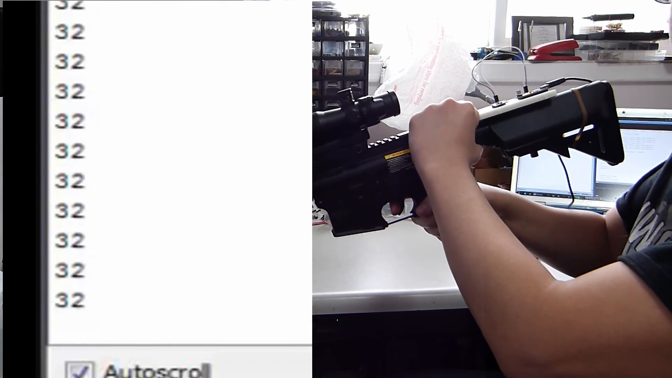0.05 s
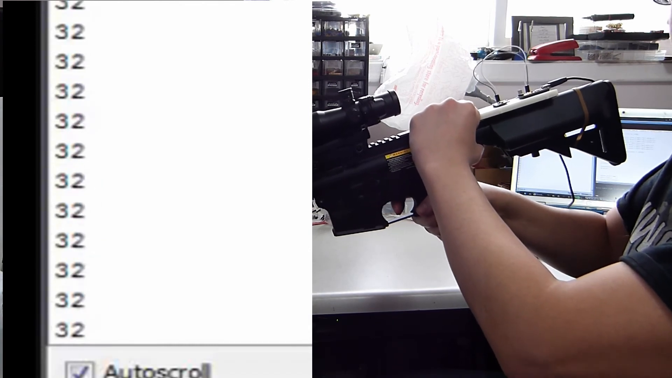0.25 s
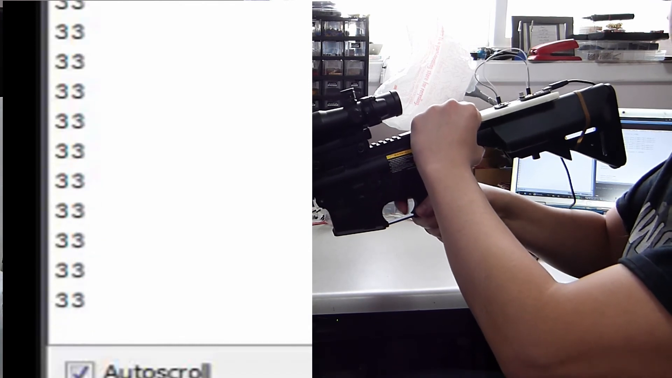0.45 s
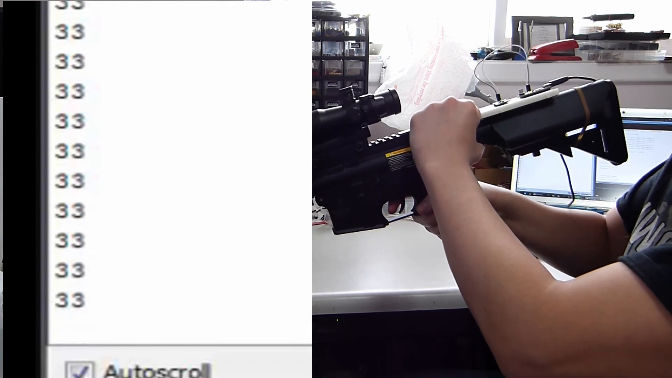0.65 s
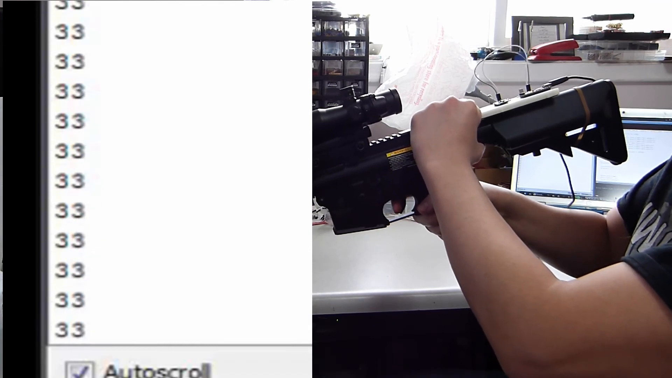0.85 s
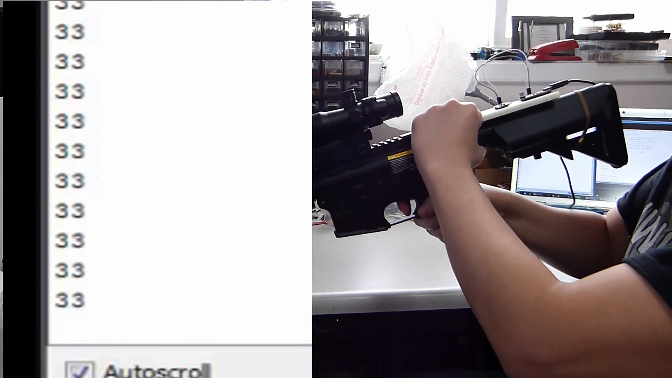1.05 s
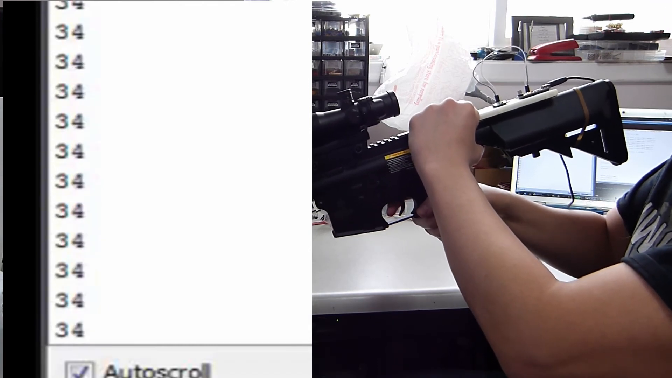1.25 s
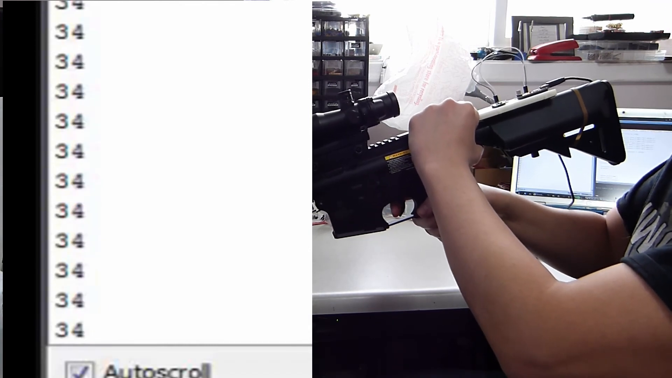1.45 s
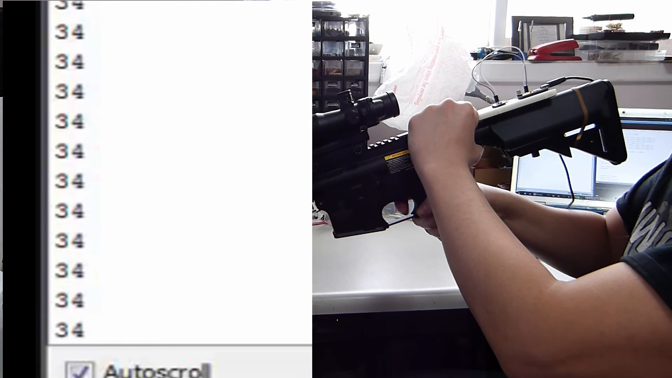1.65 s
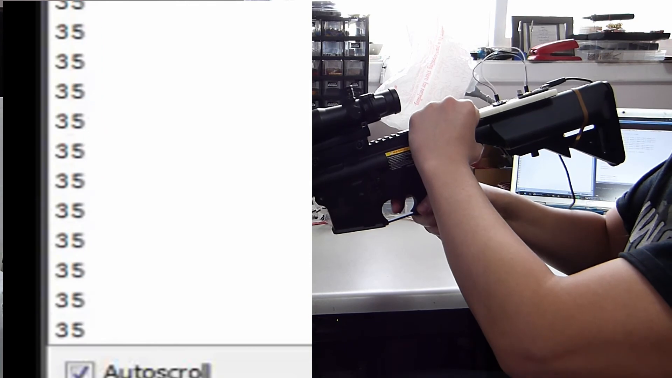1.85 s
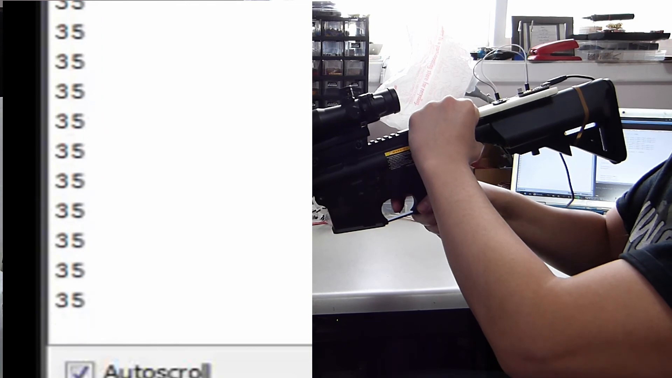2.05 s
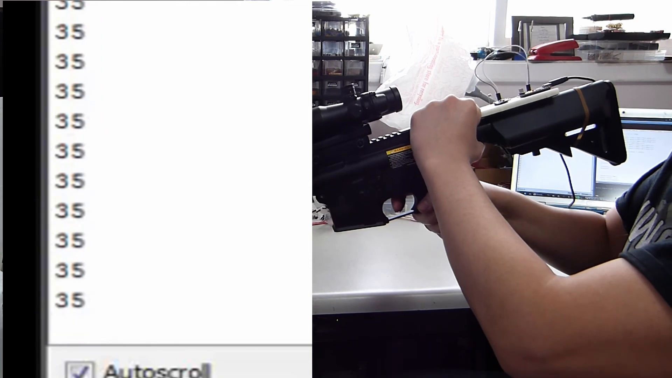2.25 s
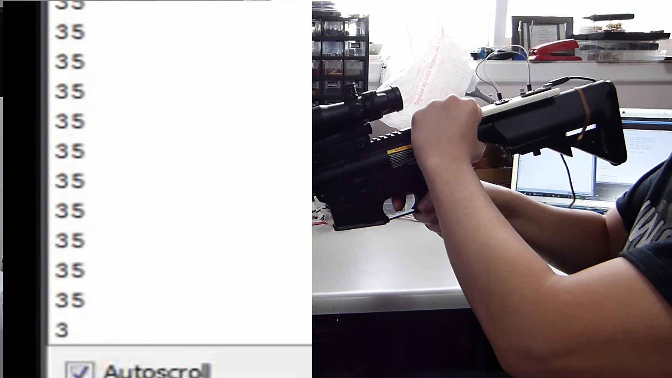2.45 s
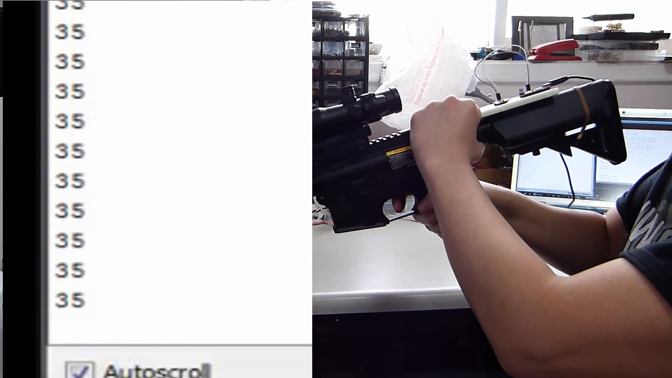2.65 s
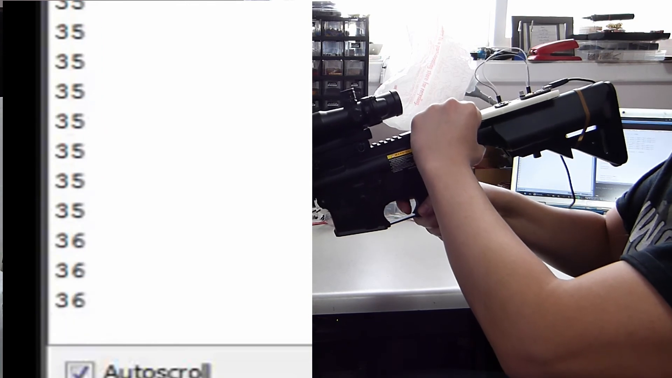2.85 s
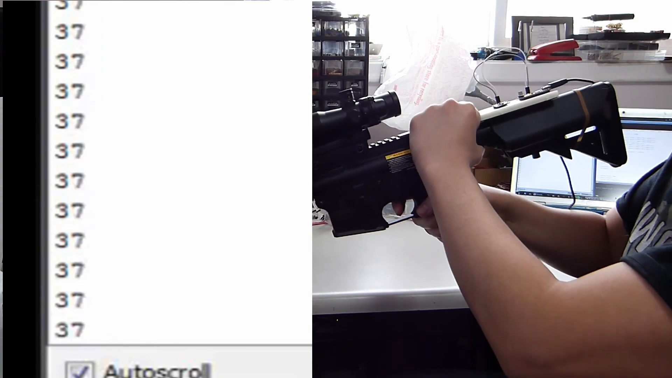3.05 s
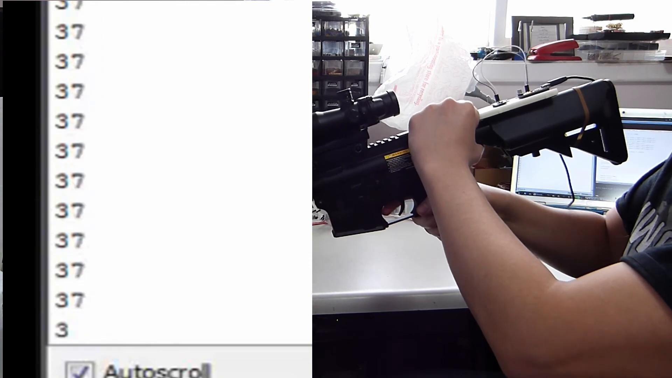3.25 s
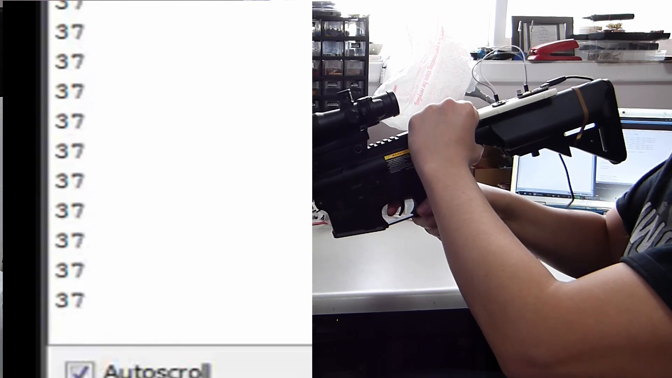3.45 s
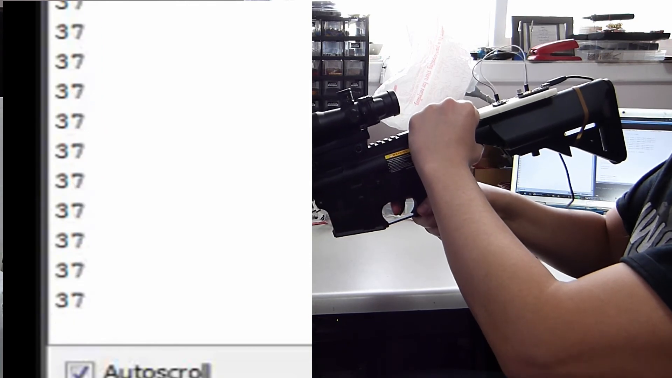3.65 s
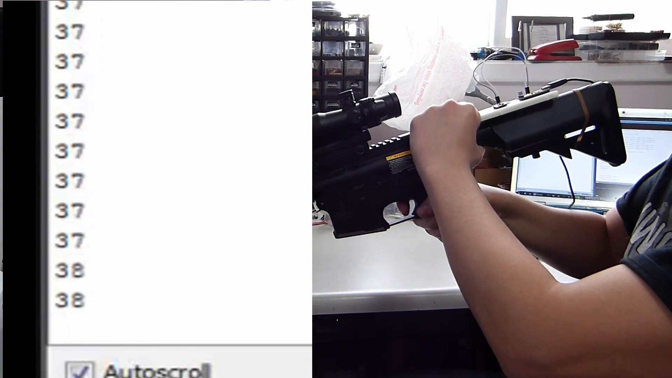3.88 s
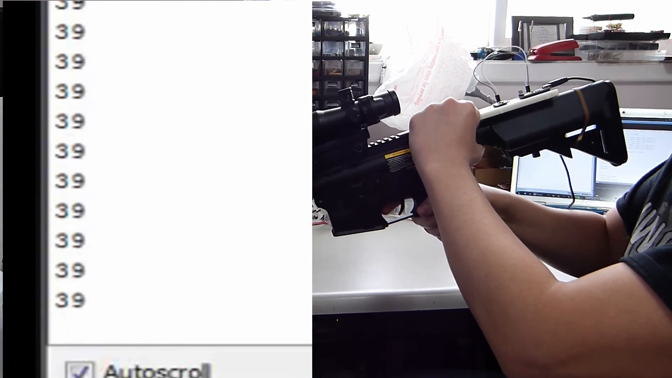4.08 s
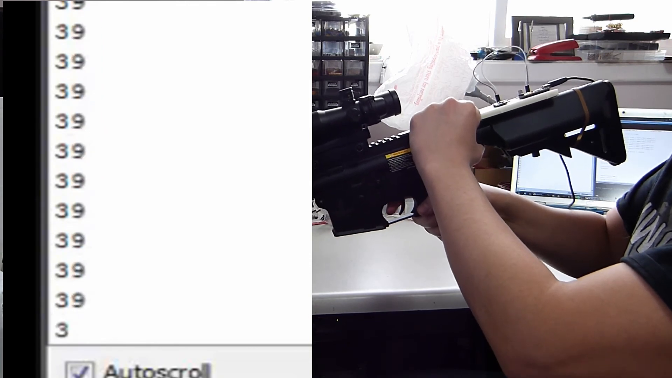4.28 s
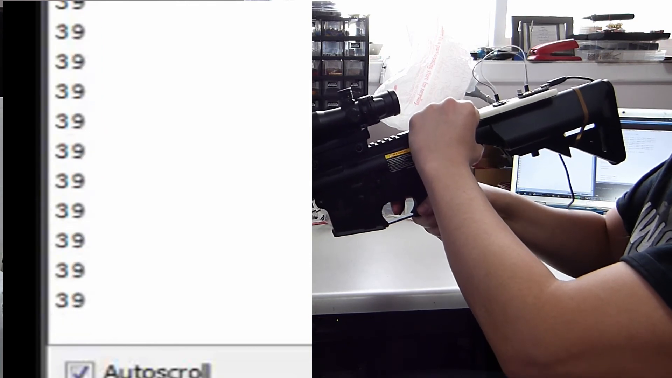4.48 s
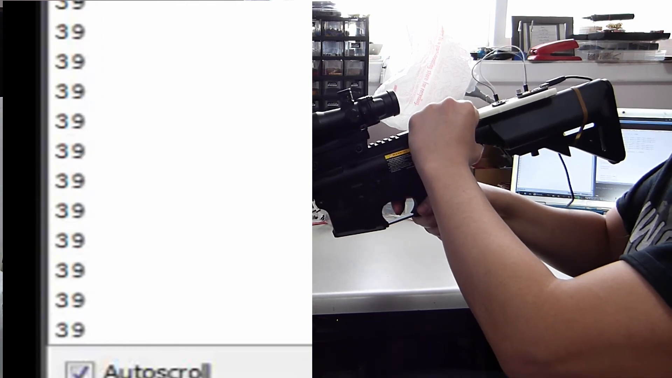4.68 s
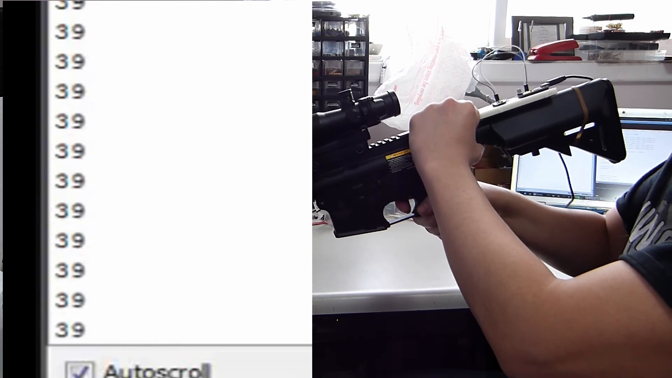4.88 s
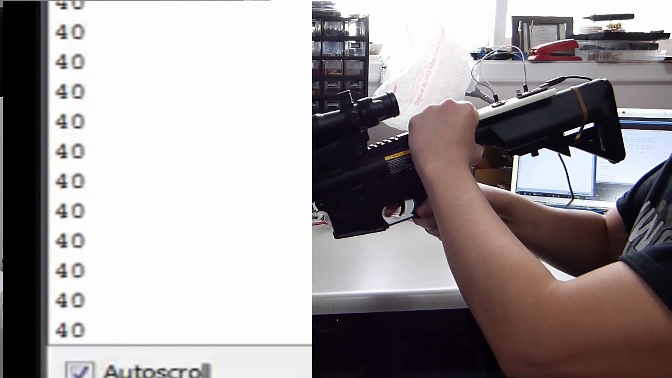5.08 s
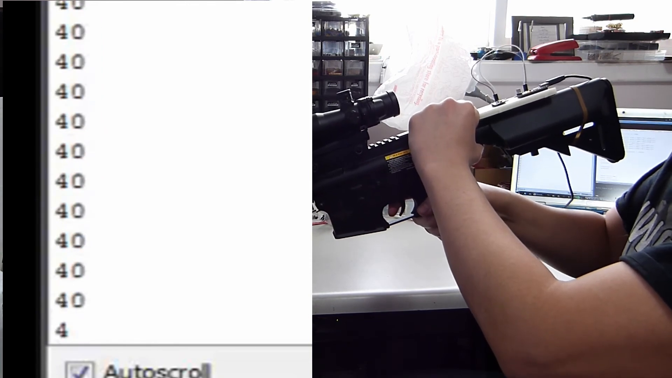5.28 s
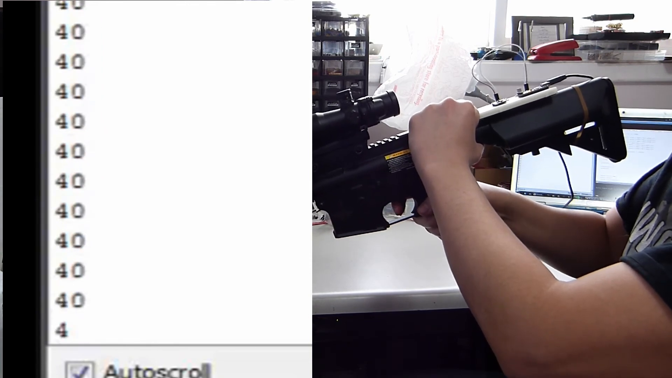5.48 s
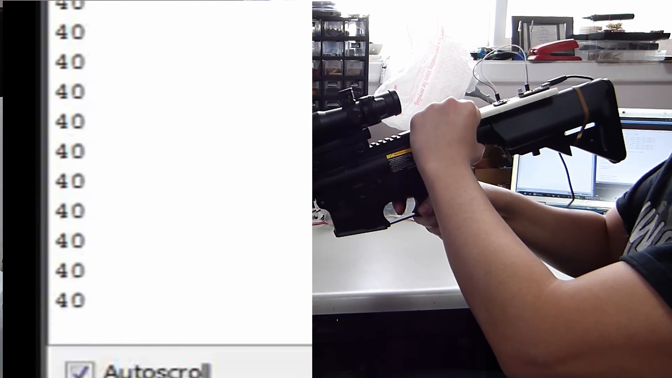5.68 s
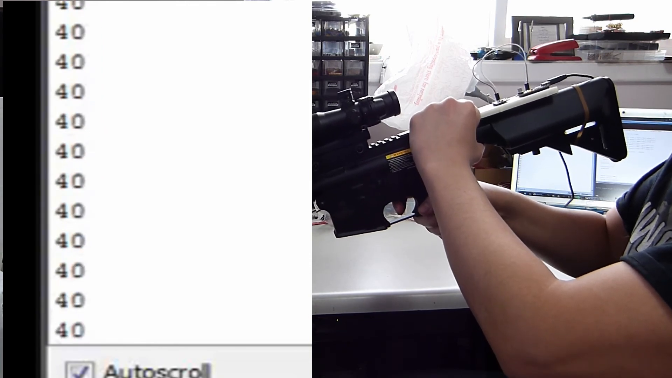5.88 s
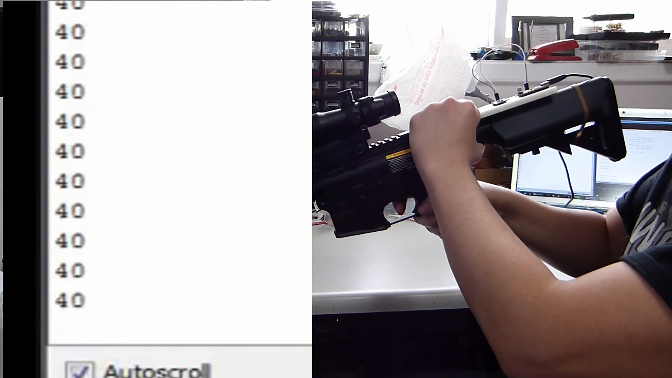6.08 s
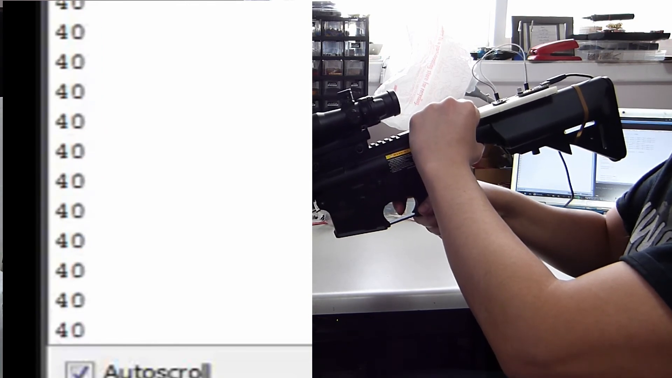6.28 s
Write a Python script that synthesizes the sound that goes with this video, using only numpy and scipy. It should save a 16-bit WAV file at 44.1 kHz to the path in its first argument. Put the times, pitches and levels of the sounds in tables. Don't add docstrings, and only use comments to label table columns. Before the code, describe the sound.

Close airsoft rifle fires six trigger pulls indoors, each a click, brief gear whir and sharp snapping crack, two pulls doubling, with a short room ring.

```python
import sys
import numpy as np
from scipy import signal
from scipy.fft import rfft, irfft
from scipy.io import wavfile
from scipy.ndimage import uniform_filter1d

SR = 44100
rng = np.random.default_rng(int(sys.argv[2]) if len(sys.argv) > 2 else 0)


def gain_from_db(level_db):
    decades = np.asarray(level_db, float) / 20
    return 10 ** decades


def bounce(signal):
    frames = np.transpose(np.atleast_2d(signal))
    limited = np.clip(frames, -1, 1)
    pcm = np.round(limited * 32767).astype(np.int16)
    wavfile.write(sys.argv[1], SR, pcm)


N = 279153

IMPACTS = [
    .5268,
    1.2059,
    1.8729,
    3.0016,
    3.1171,
    3.9635,
    4.0785,
    5.0861,
]
# (motor start [s], grind end [s], grind at speed [dB], casing ring [dB],
# teeth catch after [s])
PULLS = [
    (0.41, 0.535, -19.5, 4, .036),
    (1.098, 1.203, -20, 3.5, .042),
    (1.75, 1.881, -21, 5, 0.044),
    (2.887, 3.006, -19, 3.5, 0.039),
    (3.845, 3.967, -19.5, 2, .04),
    (4.972, 5.085, -20.5, 5, .039),
]
# (frequency [Hz], density [dB per Hz])
CRACK = [(290, -32.5), (500, -2.5), (1470, -1), (1900, -5), (3570, -6), (4490, -5.5), (5040, -5.5),
         (7640, -5.5), (10900, -9.5), (15400, -24)]
# (frequency [Hz], width [Hz], level [dB])
CASING = [(665.7, 8.5, -1.5), (712.5, 13, -1), (795, 42, 2), (910, 20, -12), (1213, 44, -6.5)]


def piston(thump_room_db=-4):
    # (crack [dB], push [dB], recoil [dB], room blast [dB], barrel ring [dB])
    slams = [
        (-16, -18, -14.5, 18, -18),
        (-14.5, -16.5, -14, 18.5, -9),
        (-16, -18.5, -15.5, 18.5, -6),
        (-12.5, -21, -15.5, 12, -15.5),
        (-15, -20.5, -19.5, 20, -5.5),
        (-13.5, -18.5, -14, 16, -2.5),
        (-16, -20.5, -20, 18.5, 0.5),
        (-13, -16, -14, 18.5, -13.5),
    ]
    # (frequency [Hz], level [dB], t60 [s])
    thud = [(121, -22, 0.1), (190, -14.5, 0.0034), (343.7, 3.5, 0.017)]
    # (frequency [Hz], level [dB], t60 [s])
    barrel = [(5491, -61, 1.2), (7187, -66, 1.2), (7924, -65, 1.0), (8716, -63, 1.3)]
    # (frequency [Hz], level [dB], t60 [s])
    hollow = [(743, -22, .45), (765, -24.5, 0.31)]
    # (lag [s], level [dB])
    reflections = [(.0066, 0.5), (.014, -5.5), (0.017, -5)]
    s = np.array(IMPACTS)
    crack_db, push_db, recoil_db, blast_db, ring_db = np.transpose(slams)

    hiss = rms_one(colour(rng.standard_normal((2, N)), CRACK))
    crack = burst(marks(s - 0.0015, crack_db), rise_s=0.003, fall_s=0.0017) * hiss
    echoes = sum(marks(s + lag_s, crack_db + echo_db) for lag_s, echo_db in reflections)
    bright_hiss = butter(hiss, order=2, hz=4500, kind="high")
    crack = crack + burst(echoes, rise_s=0.0008, fall_s=0.001) * bright_hiss

    blows = marks(s - 0.0042, push_db) - marks(s - 0.0012, recoil_db)
    thump = ring(butter(blows, order=2, hz=730, kind="low"), thud)
    thump = butter(thump, order=3, hz=112.3, kind="high")
    stereo_thump = np.array([thump, -0.6 * np.roll(thump, shift=25)])

    knocks = butter(marks(s, crack_db), order=2, hz=2020, kind="low")
    singing = ring(marks(s, ring_db + 2), barrel) + ring(knocks, hollow)
    blast = colour(marks(s, blast_db), CRACK) + gain_from_db(thump_room_db) * thump
    return crack + singing + stereo_thump, blast


def gearbox(teeth_per_s=14000, uneven_db=0.0, shell_db=7, casing_db=-4, grind_trim_db=-2, treble_trim_db=-2):
    # (frequency [Hz], density [dB per Hz])
    grind_colour = [(210, -27), (350, -19.5), (458, -8), (629, -4.5), (798, -5.5), (1040, -12.5),
                    (1130, -3.5), (1410, -10.5), (1550, -4), (2200, -8.5), (2970, -6), (10900, -12),
                    (15400, -23.5)]
    # (frequency [Hz], width [Hz], level [dB])
    shell = [(1450, 20, 0.5), (1491, 53, -2), (3020, 56, -9.5), (3373, 200, 1), (3890, 8.4, -2.5),
             (5300, 35, -14.5), (6070, 220, -24.5)]
    lumps_hz, lumps_db = 150, 1.3

    sizes = gain_from_db(uneven_db * np.minimum(rng.exponential(1, (2, N)), 4))
    sizes = sizes * rng.choice([-1, 1], (2, N))
    teeth = sizes * (rng.random((2, N)) < teeth_per_s / SR)
    rattle = colour(teeth + gain_from_db(shell_db) * resonate(teeth, shell), grind_colour)
    grind = rms_one(butter(rattle, order=2, hz=[400, 6500], kind="band"))
    treble = rms_one(butter(rattle, order=4, hz=6350, kind="high"))
    casing = rms_one(butter(resonate(teeth, CASING), order=4, hz=460, kind="high"))

    grind_db, casing_up_db, treble_up_db, running = winding()
    lumps = rms_one(butter(rng.standard_normal(N), order=2, hz=lumps_hz, kind="low"))
    level = uniform_filter1d(gain_from_db(grind_db + lumps_db * lumps) * running, size=44)
    mix = gain_from_db(grind_trim_db) * grind + gain_from_db(treble_up_db + treble_trim_db) * treble
    return level * (mix + gain_from_db(casing_up_db + casing_db) * casing)


def winding():
    # (start [s], grind end [s], grind at its end [dB])
    repeats = [
        (3.009, 3.122, -27.5),
        (3.966, 4.075, -27.5),
    ]
    start_under_db, slack_gone_s = 19, 0.026
    spin_under_db, spin_up_s, sag_db_per_s = 12.5, 0.017, 28
    ring_rise_db_per_s, ring_fall_db_per_s, ring_rest_db = 255.5, 397, -8
    dull_start_db, bright_end_db = -6, 1
    coast_under_db, coast_share, repeat_ring_db, repeat_hiss_db = 8.5, 0.4, -22.5, 1

    t, out = np.arange(N) / SR, np.zeros((4, N))
    for start, end, level_db, ring_db, catch_s in PULLS:
        now = (t >= start) & (t < end)
        age = t[now] - start
        driven = age - catch_s + slack_gone_s
        spin_db = spin_under_db * np.exp(-driven / spin_up_s)
        under_db = np.where(driven < 0, start_under_db, spin_db)
        grind = level_db - under_db - sag_db_per_s * np.maximum(age - catch_s, 0)
        rise_db = ring_rise_db_per_s * (catch_s - age)
        fall_db = ring_fall_db_per_s * (age - catch_s)
        casing = np.maximum(ring_db - np.maximum(rise_db, fall_db), ring_rest_db)
        hiss = np.interp(age, [0, end - start], [dull_start_db, bright_end_db])
        out[:, now] = grind, casing, hiss, 1 + 0 * age
    for start, end, level_db in repeats:
        now = (t >= start) & (t < end)
        share = (t[now] - start) / (end - start)
        grind = level_db - np.interp(share, [0, coast_share, 1], [0, coast_under_db, 0])
        out[:, now] = grind, repeat_ring_db + 0 * share, repeat_hiss_db + 0 * share, 1 + 0 * share
    return out


def whine():
    mesh_at_catch_hz, mesh_top_hz = 770, 1293
    whine_db, direct_db, fade_s = -24.5, -8.5, 0.039
    t, tone = np.arange(N) / SR, np.zeros(N)
    for start, end, level_db, ring_db, catch_s in PULLS:
        now = (t >= start) & (t < end)
        age = t[now] - start
        hz = mesh_top_hz * (1 - (1 - mesh_at_catch_hz / mesh_top_hz) ** (age / catch_s))
        shape = np.minimum(age / catch_s, 1) ** 2 * np.exp(-np.maximum(age - catch_s, 0) / fade_s)
        tone[now] = gain_from_db(whine_db + ring_db) * shape * np.sin(2 * np.pi * np.cumsum(hz) / SR)
    return (resonate(tone, CASING) + gain_from_db(direct_db) * tone) * [[1], [0.3]]


def trigger(click_db=-10, rattle_db=-22):
    # (time [s], peak [dB])
    clicks = [
        (0.3886, -38.5),
        (1.0742, -37),
        (1.7314, -40.5),
        (2.863, -36.5),
        (3.8248, -38),
        (4.9375, -44),
    ]
    s, peak_db = np.transpose(clicks)
    click = burst(marks(s, peak_db + click_db), rise_s=0.0003, fall_s=0.007)
    rattle = burst(marks(s, peak_db + rattle_db), rise_s=0.0019, fall_s=0.063)
    return (click + rattle) * rms_one(colour(rng.standard_normal((2, N)), CRACK))


def room_response(early_db=4, early_s=0.014):
    # (frequency [Hz], t60 [s])
    room_t60 = [(150, 0.15), (700, 0.65), (1400, 0.6), (2200, 0.37), (3500, 0.44), (6000, 0.34),
                (12000, 0.26)]
    # (frequency [Hz], level [dB])
    room_colour = [(100, -11), (300, 6.5), (800, -9.5), (3000, 1.5), (8000, 5), (15000, 9)]
    t, out = np.arange(SR) / SR, 0
    edges_hz = 70 * 2 ** np.arange(0, 8.1, 0.5)
    for low, high in zip(edges_hz, edges_hz[1:]):
        band = butter(rng.standard_normal((2, SR)), order=2, hz=[low, high], kind="band")
        hz = np.sqrt(low * high)
        out = out + band * gain_from_db(at_hz(room_colour, hz) - 60 * t / at_hz(room_t60, hz))
    out = out * (1 - np.exp(-t / 0.0015))
    out = out * (1 + gain_from_db(early_db) * np.exp(-t / early_s))
    out = out * gain_from_db(12 * (1 - np.exp(-t / 0.1)))
    return out / np.sqrt(np.sum(out ** 2, axis=1, keepdims=True))


def background():
    # (time [s], rumble [dB], hum [dB])
    air_levels = [(0, -57, -70.5), (1.2, -52.5, -68), (2.6, -53.5, -69.5), (3.8, -52.5, -72.5),
                  (5.0, -54.5, -73.5), (6.33, -55, -81)]
    # (frequency [Hz], density [dB per Hz])
    air_colour = [(22, -22.5), (38, -29.5), (62, -9.5), (113, -8.5), (144, -4), (239, -3), (266, -3),
                  (339, -0.5), (399, -4), (508, 4), (550, -6.5), (613, -3), (1140, -11), (1950, -18),
                  (2620, -19), (15400, -40.5)]
    # (frequency [Hz], side over mid [dB])
    air_side = [(60, -14), (110, -18.5), (200, -25.5), (380, -28.5), (700, -16), (1290, -6), (2380, -0.5),
                (4400, -3), (8120, -1), (15000, -1)]
    hum_hz, sink_db, recover_s = 120, 7, 0.55
    chirp_s, chirp_half_s, chirp_top_hz, chirp_droop_hz, chirp_db = 1.65, 0.068, 11600, 1800, -77

    air = colour(rng.standard_normal((2, N)), air_colour)
    air = air / np.std(butter(air[0], order=4, hz=[250, 1200], kind="band"))
    air_db, hum_db = in_time(air_levels, outside=-55)
    t = np.arange(N) / SR
    air_db = air_db - sum(sink_db * np.exp(-np.abs(t - s) / recover_s) * (t > s) for s in IMPACTS)
    hum = np.sqrt(2) * gain_from_db(hum_db) * np.sin(2 * np.pi * hum_hz * t)
    arch = np.minimum(((t - chirp_s) / chirp_half_s) ** 2, 1)
    phase = 2 * np.pi * np.cumsum(chirp_top_hz - chirp_droop_hz * arch) / SR
    chirp = gain_from_db(chirp_db) * (1 - arch) * np.sin(phase)
    return spread(air * gain_from_db(air_db), air_side) + hum + chirp


def ducking(loud, knee_db=-38, slope=0.56, release_db_per_s=250):
    level_db = 10 * np.log10(uniform_filter1d(loud ** 2, size=441) + 1e-12)
    ramp = release_db_per_s * np.arange(N) / SR
    held_db = np.maximum.accumulate(level_db + ramp) - ramp
    return gain_from_db(-slope * uniform_filter1d(np.maximum(held_db - knee_db, 0), size=221))


def rms_one(x):
    return x / np.sqrt(np.mean(x ** 2) + 1e-20)


def in_time(rows, outside):
    s, *columns = np.transpose(rows)
    return np.array([np.interp(np.arange(N) / SR, s, c, outside, outside) for c in columns])


def at_hz(points, hz):
    points_hz, level_db = np.transpose(points)
    return np.interp(np.log(hz + 1), np.log(points_hz), level_db)


def colour(x, points):
    size = x.shape[-1]
    return irfft(rfft(x) * gain_from_db(at_hz(points, np.fft.rfftfreq(size, 1 / SR))), size)


def butter(x, order, hz, kind):
    return signal.sosfilt(signal.butter(order, hz, kind, fs=SR, output="sos"), x)


def spread(pair, side_points):
    side = colour(pair[1], side_points)
    return np.array([pair[0] + side, pair[0] - side])


def resonate(x, peaks):
    out = 0
    for k, (hz, width_hz, db) in enumerate(peaks):
        r = np.exp(-np.pi * width_hz / SR)
        a = [1, -2 * r * np.cos(2 * np.pi * hz / SR), r * r]
        b = [(1 - r * r) / 2, 0, (r * r - 1) / 2]
        out = out + (-1) ** k * gain_from_db(db) * signal.lfilter(b, a, x)
    return out


def ring(clicks, modes):
    out = 0
    for hz, db, t60_s in modes:
        r, w = gain_from_db(-60 / (t60_s * SR)), 2 * np.pi * hz / SR
        a = [1, -2 * r * np.cos(w), r * r]
        out = out + gain_from_db(db) * signal.lfilter([0, np.sin(w)], a, clicks + 1e-18)
    return out


def marks(times_s, levels_db):
    out = np.zeros(N)
    out[np.round(np.array(times_s) * SR).astype(int)] = gain_from_db(np.array(levels_db))
    return out


def burst(clicks, rise_s, fall_s):
    t = np.arange(SR // 10) / SR
    shape = (1 - np.exp(-t / rise_s)) * np.exp(-t / fall_s)
    return signal.fftconvolve(clicks, shape / shape.max())[:N]


def scene():
    # (frequency [Hz], side over mid [dB])
    rifle_side = [(60, -4.5), (110, -4.5), (200, -12.5), (380, -8.5), (700, -11), (1290, -8), (2380, -3.5),
                  (4400, -4), (8120, 0), (15000, 2.5)]
    gears = gearbox() + whine()
    slams, blast = piston()
    response = room_response()
    wet = signal.fftconvolve(gain_from_db(-9) * gears + blast, response, axes=1)[:, :N]
    earlier = colour(response, CRACK)[:, int(0.15 * SR):]
    wet[:, :earlier.shape[1]] += gain_from_db(20) * earlier
    rifle = spread(gears + slams + trigger() + wet, rifle_side)
    return rifle + ducking(rifle[0]) * background()


def top_cut(x):
    return signal.sosfilt(signal.butter(12, 15590, fs=SR, output="sos"), x)


def record(dry):
    # (frequency [Hz], left over right [dB])
    lean = np.array([(100, -0.5), (300, -1), (700, -1.5), (2000, -0.5), (5000, 2), (9000, 1), (15000, 4.5)])
    left, right = colour(dry[0], lean * [1, 0.5]), colour(dry[1], lean * [1, -0.5])
    ports = butter(np.array([left, right]), order=8, hz=14200, kind="low")
    return top_cut(1.21 * np.tanh(ports / 0.95))


dry = scene()
out = record(dry)
bounce(out)
```